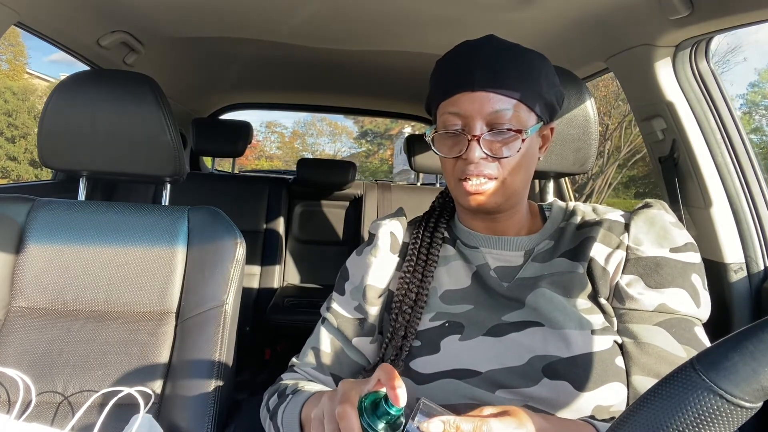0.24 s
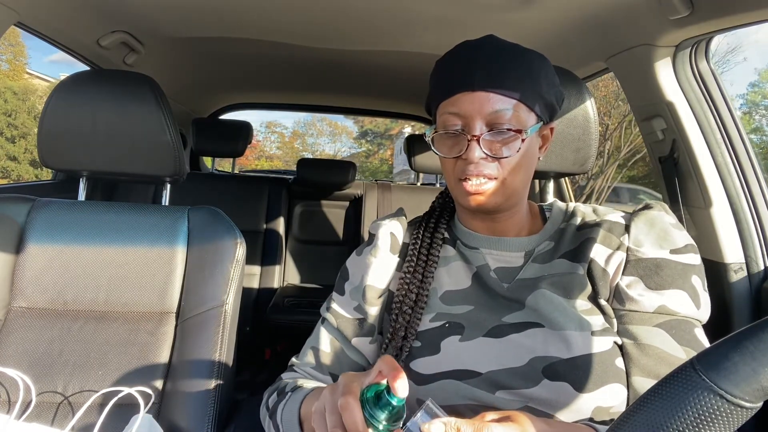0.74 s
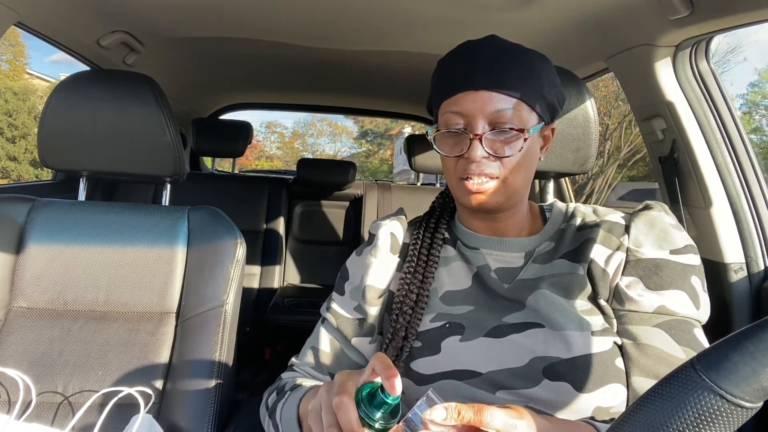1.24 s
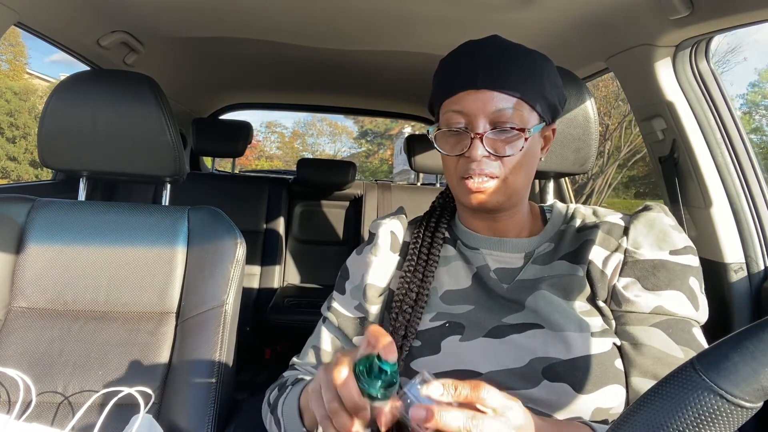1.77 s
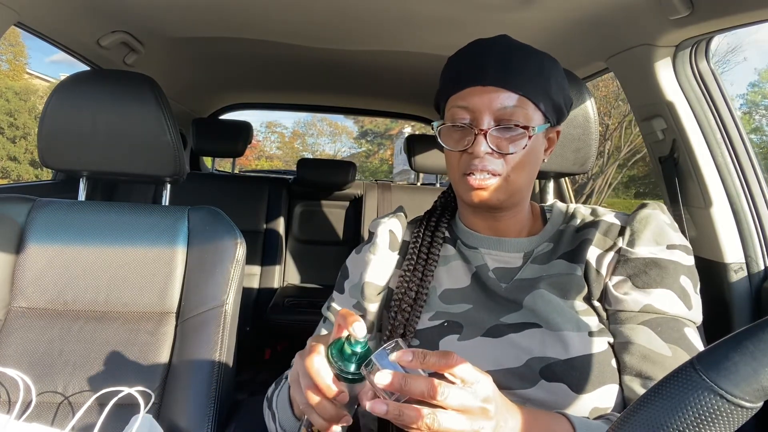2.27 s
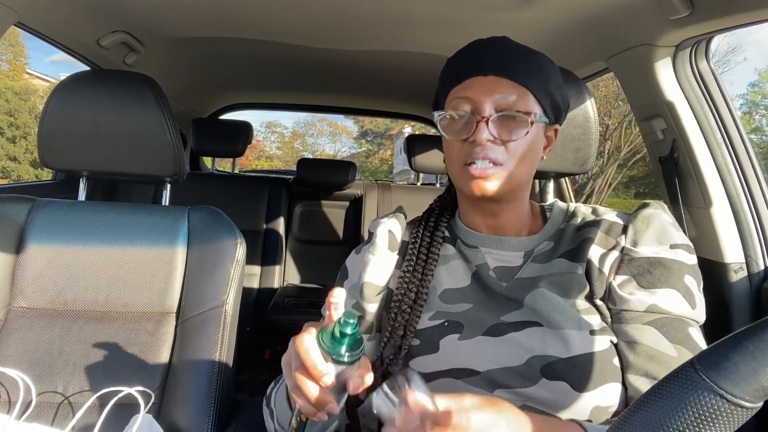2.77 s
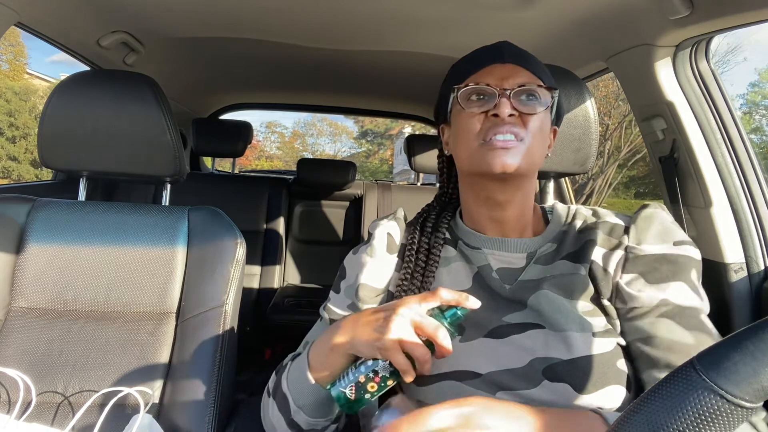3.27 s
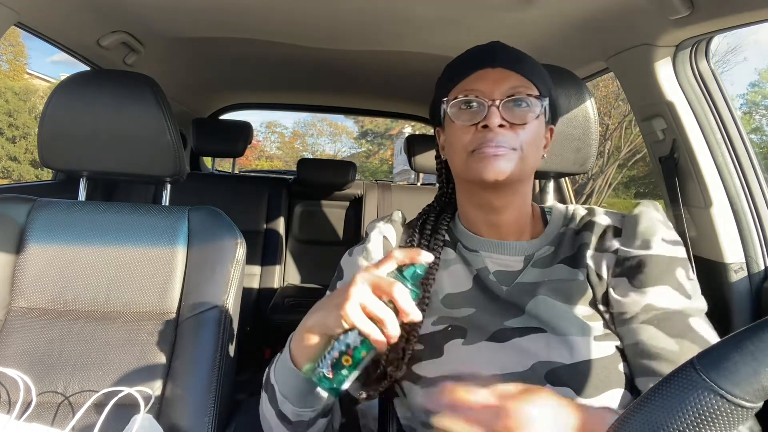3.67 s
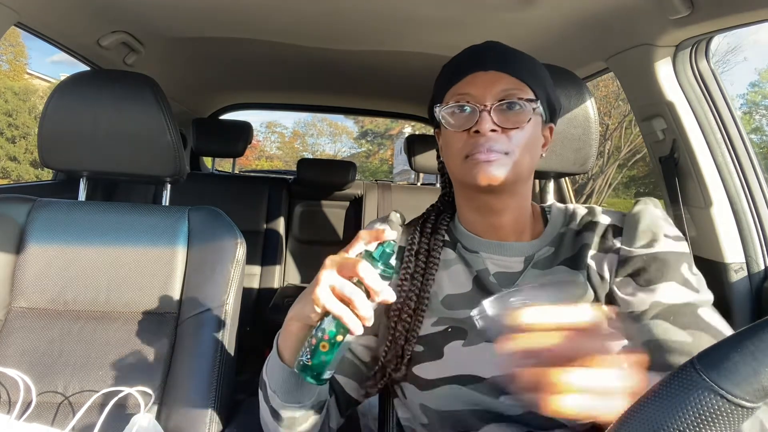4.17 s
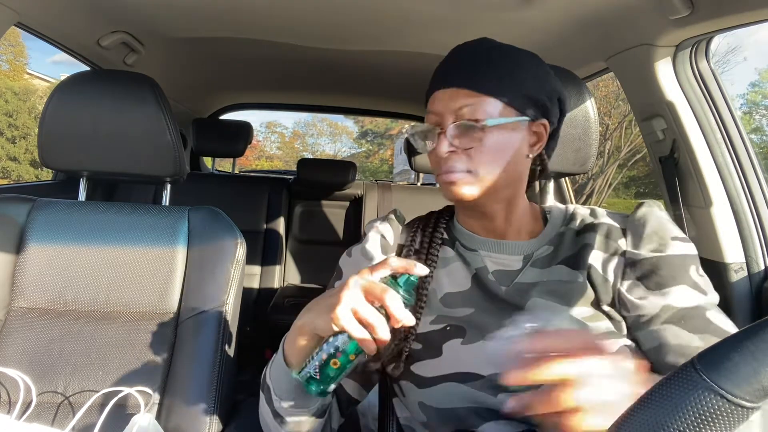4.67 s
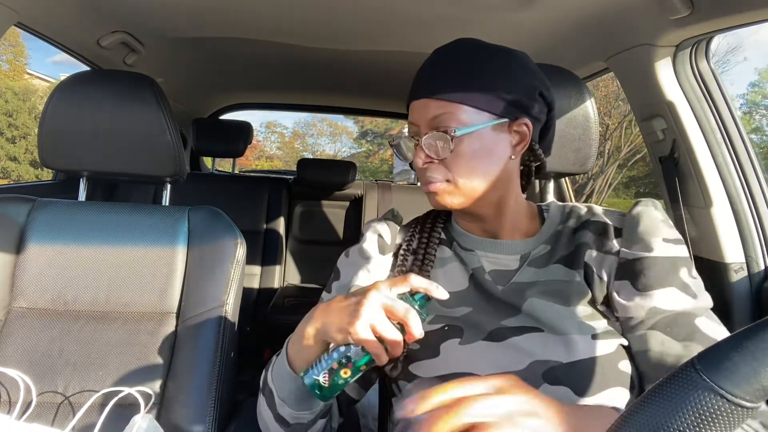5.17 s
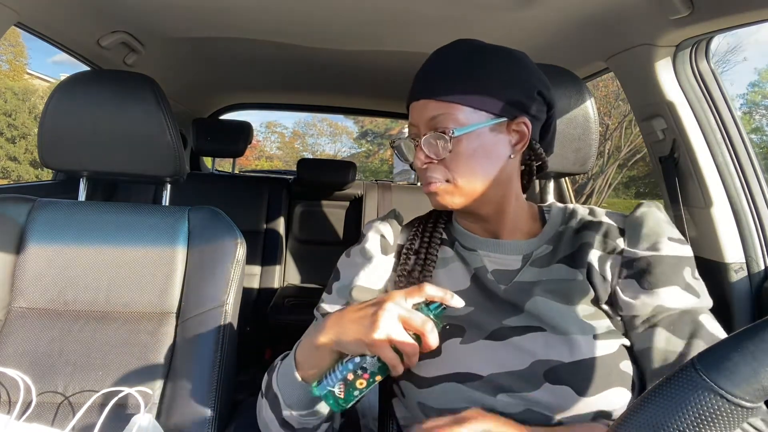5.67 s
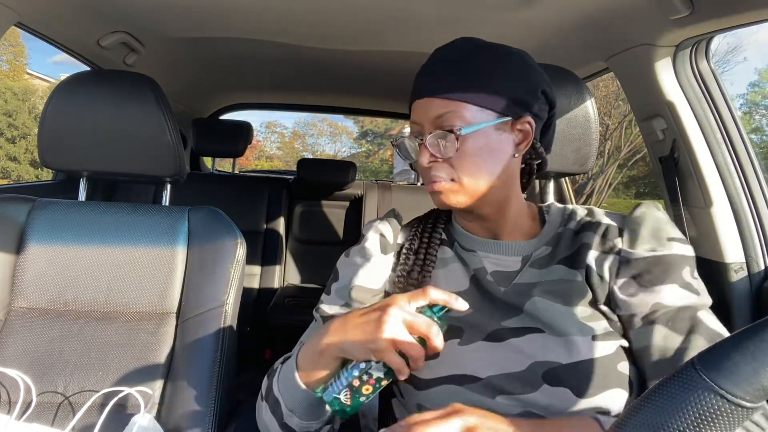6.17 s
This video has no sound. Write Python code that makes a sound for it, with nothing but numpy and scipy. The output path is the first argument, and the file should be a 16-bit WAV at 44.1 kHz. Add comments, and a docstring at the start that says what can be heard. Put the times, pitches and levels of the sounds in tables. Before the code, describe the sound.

Over a car's low idle and rushing fan, a spray bottle is pumped with light, rapid clicks and gives two short mist hisses.

```python
"""In a parked car, the engine idles and the blower rushes from start to end.
A small plastic pump bottle gets quick dry strokes; each clicks, knocks and puffs air.
Once liquid fills the pump, it sprays twice, at about 2 and 2.4 seconds. Faint taps and
hisses follow later, and near the end a hand bumps the car's trim with two soft thuds."""
import sys
import numpy as np
from scipy import signal
from scipy.fft import rfft, irfft
from scipy.io import wavfile
from scipy.ndimage import uniform_filter1d

SR = 44100
rng = np.random.default_rng(int(sys.argv[2]) if len(sys.argv) > 2 else 0)


def file_out(sig):
    """Save sig as 16-bit WAV at sys.argv[1]."""
    # one column per channel
    cols = np.atleast_2d(sig).T
    # limit, then scale
    lim = np.clip(cols, -1, 1)
    pcm = np.round(lim * 32767).astype(np.int16)
    wavfile.write(sys.argv[1], SR, pcm)


N = 283122
HZ, TIME = np.arange(N // 2 + 1) * SR / N, np.arange(N) / SR

# The tone of the blower. Each row: frequency in Hz, relative level in dB.
RUSH_TONE = [(20, -45.5), (35, -25.5), (60, -3), (176, -7), (230, -10.5), (315, -13), (420, -24.5),
             (1140, -28), (1500, -35.5), (2000, -36), (2600, -43), (5000, -51.5), (8000, -63.5),
             (14000, -67)]
# Where the cabin and air ducts ring. Each row: frequency in Hz, width in Hz, boost in dB.
DUCT_RINGS = [(171, 40, 1.5), (301.3, 62, 4.5), (439, 96, 11.5), (657.5, 146, 8.5), (783, 33, 7),
              (884, 172, 6), (1178, 116, 7), (1930, 120, 4.5)]
# The slow swell of the blower's treble. Each row: time in seconds, relative level in dB.
TREBLE_SWELL = [(0.0, -81.5), (0.6, -84.5), (0.87, -81.5), (2.74, -84.5), (3.69, -82.5), (6.4, -82.5)]
# The engine's boom. Each row: time in seconds, level in dB.
IDLE_LEVEL = [(0, -40), (3.1, -38.5), (5.1, -35), (5.3, -38), (6.2, -35), (6.42, -34)]
# Brief dips in the boom. Each row: time in seconds, change in dB. Then half a dip's length.
IDLE_DIPS, DIP_S = [(3.2, -16), (3.74, -14)], 0.04
# A hand bumps the trim. Each row: start in seconds, strength in dB, pitch in Hz.
BUMPS = [(6.295, -9, 93), (6.314, -10.5, 99.6)]
# The pump head's own tones. Each row: pitch in Hz, relative level in dB, seconds to fade by 60 dB.
HEAD_TONES = [(1500, 2, 0.04), (1620, 6, 0.024), (1765, 5, 0.025), (1900, 5, .02), (2050, 4, 0.022),
              (2310, 3, 0.025), (2600, 8, 0.009), (3030, 4, 0.013), (3250, -1, 0.012), (3455, 4, 0.032),
              (3660, 3, 0.028), (3790, 0, 0.014), (4070, -7, .014), (4450, -3, .018), (4850, -4, .016),
              (5350, -7, .013)]
# The noise in a click's crack. Each row: centre in Hz, width in Hz, seconds to fade by 60 dB.
CRACK_BANDS = [(4700, 1300, 0.06), (7600, 3400, 0.066), (13000, 3600, 0.015)]
# The head hits its stops or is tapped. Each row: time in seconds, levels in dB of the high ring,
# low knock and crack, the crack's tilt in dB per octave, centres in Hz of the knock and ring.
CLICKS = [(0.052, -36.5, -41, -76, 2, 1530, 3300), (0.0966, -48.5, -34, -62, -12, 1520, 3000),
          (0.1282, -57, -27, -61, -6, 1610, 3060), (0.3, -26.5, -33, -56.5, 7, 1500, 3240),
          (0.343, -45, -32.5, -57.5, -5, 1490, 3000), (0.417, -50, -41, -60, -4, 1940, 3030),
          (0.5542, -23, -35, -57, 2, 1500, 3370), (0.597, -42, -35, -63, -6, 1510, 3450),
          (0.641, -56, -34.5, -77, -9, 1610, 3000), (0.8022, -24, -33.5, -58, 2, 1520, 3430),
          (0.8493, -45, -37, -67, -8, 1510, 3700), (0.873, -50, -30, -56, -4, 1690, 3730),
          (1.0478, -22.5, -33, -56, 3, 2060, 3360), (1.091, -42, -39, -61, -11, 1490, 3640),
          (1.2938, -24.5, -36, -69, -4, 1520, 3220), (1.3402, -46, -44, -67, -5, 1520, 3650),
          (1.3813, -53, -26.5, -56, -5, 1870, 3660), (1.5439, -20, -30, -61, -3, 1500, 3230),
          (1.587, -43, -36, -60, -11, 1520, 3640), (1.8348, -36.5, -40, -61, -17, 1650, 4300),
          (1.947, -44, -48, -70, -5, 2000, 3000), (2.1219, -26.5, -30, -65, 4, 2090, 3180),
          (2.173, -38, -37, -57.5, -10, 1610, 4700), (2.4966, -29, -31.5, -60, 2, 2200, 2700),
          (2.5502, -39, -34.5, -61, -9, 2100, 4500), (4.78, -49, -54, -72, -8, 2000, 4350),
          (5.235, -57, -56, -62, 5, 2000, 4700), (6.266, -53, -39, -54, 5, 1700, 4600)]
# Air leaves the nozzle. Each row: start in seconds, high and low hiss in dB, hold in seconds.
PUFFS = [(0.0887, -68, -69, .004), (0.187, -58, -66, .002), (0.215, -58, -69, 0.013),
         (0.334, -70, -68, .004), (0.4369, -60, -69, .004), (0.465, -60, -69, 0.012),
         (0.6843, -66, -75, .004), (0.718, -58, -68, 0.013), (0.836, -76, -69, .002),
         (0.9233, -62, -63, .002), (0.956, -56, -67, 0.01), (1.0789, -66.5, -63, .002),
         (1.1662, -63, -65, .002), (1.205, -58, -66, .012), (1.4007, -66, -61, .004),
         (1.439, -60, -66, .011), (1.664, -70, -57.5, .002), (1.709, -71, -69, .002),
         (1.826, -69, -68, .002), (1.931, -66, -52, .002), (2.143, -72.5, -64, .002),
         (2.3092, -65, -60, .002), (2.482, -66, -68, .002), (2.5237, -76, -59, .002),
         (5.0025, -62, -67, .002), (5.2345, -69, -66, .006), (5.7848, -65, -68, .002),
         (5.8646, -61, -65, .003), (6.26, -65, -65, 0.0055)]
# Liquid jets. Each row: start, peak and end in seconds, then high hiss, low hiss and body in dB,
# then flow at the end and flow of the trailing mist, both in dB from the peak.
SPRAYS = [(1.985, 2.004, 2.038, -47.5, -51.5, -48, -9.5, -12),
          (2.354, 2.405, 2.48, -41, -48.5, -48, -22, -26)]
# How alike the left and right microphone openings hear. Each row: frequency in Hz, likeness 0 to 1.
LIKENESS = [(50, 0.83), (80, 0.84), (130, 0.95), (290, 0.53), (640, 0.46), (1400, 0.22), (3100, 0.057),
            (6000, 0.41), (7200, 1), (15000, 1)]
# How far the right side is ahead. Each row: frequency in Hz, lead in radians.
RIGHT_LEAD = [(0, 0), (1000, .2), (3700, 1.7), (5650, np.pi), (15300, -3 * np.pi)]
# Which side is louder. Each row: frequency in Hz, left minus right in dB.
BALANCE = [(60, -1), (200, -1.4), (1200, -2), (2500, 1.8), (10000, -0.4)]

RUSH_DB, FIRING_HZ, TOP_HZ = -30, 24.6, 15700
CABIN_T60_S, CABIN_DB, NEAR_LIKENESS = .04, -11, .85  # T60 is the time to fade by 60 dB
PRIMED_S, WET_RING = 1.7, 0.73  # from then on, liquid shortens the rings by this factor
# Tones weaken away from a hit's centre, in dB per unit of log pitch: knock first, then ring.
DRY_REACH_DB, WET_REACH_DB = (-32, -40), (-8, -22)
STRIKE_S, PUSH_S, SCUFF_T60_S, TAP_T60_S = .00025, .00055, 0.019, .0018
HARD_DB, BOUNCE_S, BOUNCE_DB = -30, .008, -13
PUFF_T60_S, MIST_T60_S = 0.04, 0.11
JET_OPENS_DB, JET_RISE_S, JET_TAPER = -13, 0.0018, 1.3
JET_FIRM = .25  # share of the swell that the low hiss ignores


def undb(db):
    """Turn decibels into a gain."""
    return 10 ** (np.asarray(db) / 20)


def over_hz(table):
    """Join a table's points along a log-frequency axis."""
    hz, value = np.transpose(table)
    return np.interp(np.log(HZ + 1), np.log(hz), value)


def band(x, hz, width_hz):
    """Keep one bell-shaped band of a sound, at an rms level of 1."""
    y = irfft(rfft(x, N) * np.exp(-((HZ - hz) / width_hz) ** 4), N)
    return y / y.std()


def walk(rate):
    """Drift smoothly by about 1 either way, to a new random value `rate` times a second."""
    hold = int(SR / rate)
    steps = np.repeat(rng.standard_normal(N // hold + 1), hold)
    return 1.397 * uniform_filter1d(uniform_filter1d(steps, hold), hold)[:N]


def add(out, s, sound):
    """Mix a sound in, starting at s seconds."""
    i = int(s * SR)
    out[i:i + len(sound)] += sound[:N - i]


def fade(t, rise_s, t60_s):
    """Rise, then die away."""
    return (1 - np.exp(-t / rise_s)) * np.exp(-np.log(1000) * t / t60_s)


def stereo(shared, apart, min_likeness=0):
    """Two microphone openings hear the bass alike, the middle differently, the treble with a lag."""
    like = np.clip(over_hz(LIKENESS), min_likeness, 1)
    turn = np.exp(.5j * np.interp(HZ, *np.transpose(RIGHT_LEAD)))
    tilt = undb(over_hz(BALANCE) / 2)
    both = np.sqrt(like) * rfft(shared) * np.array([1 / turn, turn]) + np.sqrt(1 - like) * rfft(apart)
    return irfft(both * np.array([tilt, 1 / tilt]), N)


def cabin(x):
    """Add short, dense echoes off the glass and seats."""
    t = np.arange(SR // 8) / SR
    tails = rng.standard_normal((3, len(t))) * fade(t, 0.0096, CABIN_T60_S)  # shared, left, right
    tails *= undb(CABIN_DB) / np.sqrt(np.sum(tails ** 2, axis=1, keepdims=True))
    tails[0, 0] += 1  # the direct sound
    tails[1:] *= np.sqrt(1 + undb(-2 * CABIN_DB))
    echoed = signal.fftconvolve(x[None], tails, axes=1)[:, :N]
    return stereo(echoed[0], echoed[1:], NEAR_LIKENESS)


def blower():
    """Air rushes through the ducts; each octave swells and flickers on its own."""
    treble_db = np.interp(TIME, *np.transpose(TREBLE_SWELL))
    treble_db -= treble_db.mean()
    ducts_db = sum(db / (1 + (2 * (HZ - hz) / width) ** 2) for hz, width, db in DUCT_RINGS)
    spectrum = rfft(rng.standard_normal((3, N))) * undb(over_hz(RUSH_TONE) + ducts_db)
    octave, out = np.log2(HZ + 1), 0
    for centre in range(4, 15):
        part = irfft(spectrum * np.clip(1 - np.abs(octave - centre), 0, 1), N)
        treble_share = np.clip((centre - 11) / 2.5, 0, 1)
        out = out + part * undb(treble_share * treble_db + 0.75 * walk(3.72) + 0.72 * walk(23.194))
    out *= undb(RUSH_DB) / out.std()
    return stereo(out[0], out[1:])


def engine():
    """The car body booms at one, two and three times the firing rate; the second is steadiest."""
    db = np.interp(TIME, *np.transpose(IDLE_LEVEL))
    db += sum(dip_db * np.exp(-((TIME - s) / DIP_S) ** 2) for s, dip_db in IDLE_DIPS)
    phase = 2 * np.pi * np.cumsum(FIRING_HZ * (1 + 0.01114 * walk(6.27))) / SR
    first, third = undb(-17.5 + 2.0 * walk(3.6)), undb(-8.0 + 3.1 * walk(2.0))
    tones = first * np.sin(phase) + np.sin(2 * phase) + third * np.sin(3 * phase)
    return undb(db + walk(9)) * np.sqrt(2) * tones


def trim_bumps():
    """A hand softly pushes a panel, which dips and springs back."""
    out, t = np.zeros(N), np.arange(SR // 10) / SR
    for s, db, hz in BUMPS:
        add(out, s, -undb(db) * fade(t, 0.0023, 0.042) * np.sin(2 * np.pi * hz * t))
    return out


def head_tones(t, knock_hz, ring_hz, wet, scatter):
    """Where a hit lands picks the low and high tones; liquid spreads it over more of them."""
    hz, db, t60_s = np.array(HEAD_TONES).T[:, :, None]
    is_low = hz < 2500
    distance = np.abs(np.log(hz / np.where(is_low, knock_hz, ring_hz)))
    reach_db = np.where(is_low, *(WET_REACH_DB if wet else DRY_REACH_DB)) * distance
    decay = fade(t, STRIKE_S, t60_s * (WET_RING if wet else 1))
    waves = np.sin(2 * np.pi * hz * (1 + .004 * scatter[1]) * t)
    tones = undb(db + reach_db + 1.5 * scatter[0]) * decay * waves
    return (tones * is_low).sum(axis=0), (tones * ~is_low).sum(axis=0)


def pump_clicks():
    """Each hit on the plastic head makes a low knock, a high ring and a short noisy crack."""
    out, t = np.zeros(N), np.arange(SR // 10) / SR
    bands = [(np.log2(hz / 8100), t60_s, band(rng.standard_normal(N), hz, width))
             for hz, width, t60_s in CRACK_BANDS]
    scatters = rng.standard_normal((len(CLICKS), 2, len(HEAD_TONES), 1))
    contacts = rng.standard_normal((len(CLICKS), len(t)))
    for click, scatter, contact in zip(CLICKS, scatters, contacts):
        s, ring_db, knock_db, crack_db, tilt_db, knock_hz, ring_hz = click
        low, high = head_tones(t, knock_hz, ring_hz, s > PRIMED_S, scatter)
        rise_s = min(1e-4 * undb(-3.5 * (max(ring_db, knock_db) + 24)), .003)  # weak hits build slowly
        scuff = (contact + 8 * (t == t[int(rise_s * SR)])) * fade(t, rise_s, SCUFF_T60_S)
        blunt_push = np.convolve(scuff, np.hanning(int(PUSH_S * SR)))
        # A hard hit rings from one clean tap that bounces once.
        tap = (contact + 10 * (t == t[1])) * fade(t, 1e-5, TAP_T60_S)
        tap += undb(BOUNCE_DB) * np.roll(tap, int(BOUNCE_S * SR))
        knock = signal.fftconvolve(low, blunt_push)[:len(t)]
        ring = signal.fftconvolve(high, tap if ring_db > HARD_DB else scuff)[:len(t)]
        add(out, s - rise_s, undb(knock_db) * knock / np.abs(knock).max())
        add(out, s - rise_s, undb(ring_db) * ring / np.abs(ring).max())
        for octaves, t60_s, noise in bands:
            crack = fade(t, 0.00018, t60_s) * noise[int(s * SR):][:len(t)]
            add(out, s, undb(crack_db + tilt_db * octaves) * crack)
    return out


def air_puffs(low, high):
    """Air squeezed through the nozzle hisses and dies away quickly."""
    low_gain, high_gain, t = np.zeros(N), np.zeros(N), np.arange(SR // 5) / SR
    for s, high_db, low_db, hold_s in PUFFS:
        fall = np.exp(-np.log(1000) * np.maximum(t - hold_s, 0) / PUFF_T60_S)
        add(high_gain, s, undb(high_db) * (1 - np.exp(-t / 0.0017)) * fall)
        add(low_gain, s, undb(low_db) * (1 - np.exp(-t / 0.0012)) * fall ** 1.5)
    return band(low, 8100, 1300) * low_gain + high * high_gain * undb(1.5 * walk(300))


def liquid_sprays(low, high, body):
    """The valve snaps open below full flow; the jet swells, tapers and trails off as mist."""
    out = np.zeros(N)
    for s, peak_s, end_s, high_db, low_db, body_db, fall_db, mist_db in SPRAYS:
        swell = JET_OPENS_DB * ((TIME - peak_s) / (peak_s - s)).clip(-1) ** 2
        taper = fall_db * ((TIME - peak_s) / (end_s - peak_s)).clip(0) ** JET_TAPER
        mist = mist_db - 60 * (TIME - end_s) / MIST_T60_S
        flow_db = np.select([TIME < peak_s, TIME <= end_s], [swell, taper], mist)
        flow = undb(flow_db + 1.2 * walk(200)) * np.clip((TIME - s) / JET_RISE_S, 0, 1)
        hiss = undb(high_db) * high + undb(low_db - JET_FIRM * flow_db.clip(fall_db)) * low
        out += flow * (hiss + undb(body_db + 0.23 * flow_db + 2.0 * walk(150)) * body)
    return out


def nozzle():
    """Puffs and sprays share a low and a high hiss; liquid adds a deeper body of noise."""
    low, high = band(rng.standard_normal(N), 8840, 1250), band(rng.standard_normal(N), 13000, 2300)
    body = band(rng.standard_normal(N), 3600, 1700) + undb(-6) * band(rng.standard_normal(N), 6500, 580)
    return air_puffs(low, high) + liquid_sprays(low, high, body)


def scene():
    """Mix the bottle and its echoes with the low boom and the blower."""
    boom = engine() + trim_bumps()
    return cabin(pump_clicks() + nozzle()) + stereo(boom, np.array([boom, boom])) + blower()


def record(dry):
    """Cut off the highest treble."""
    return signal.sosfilt(signal.ellip(8, .2, 70, TOP_HZ, fs=SR, output="sos"), dry)


dry = scene()
out = record(dry)
file_out(out)
```